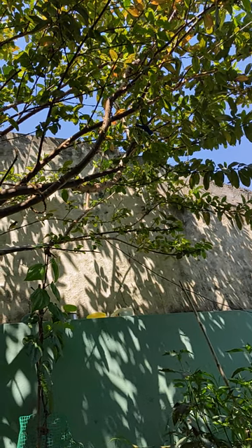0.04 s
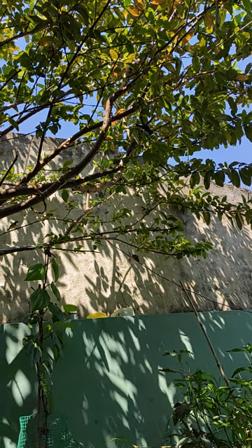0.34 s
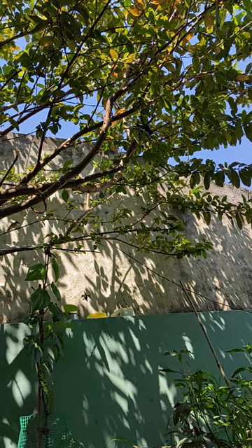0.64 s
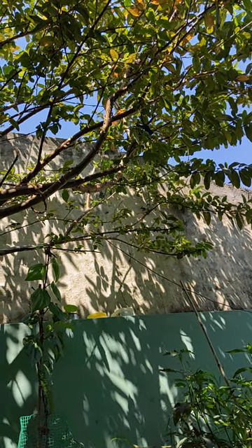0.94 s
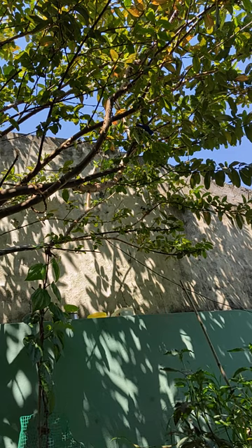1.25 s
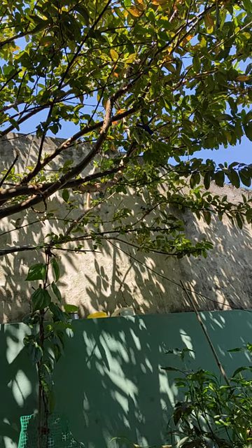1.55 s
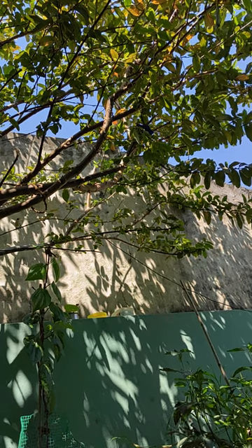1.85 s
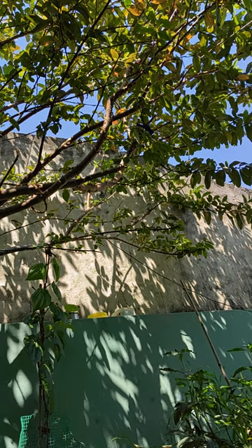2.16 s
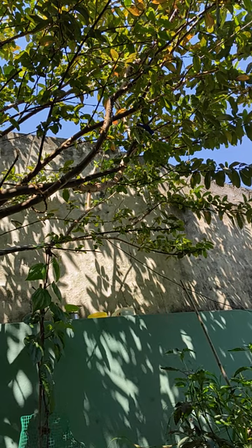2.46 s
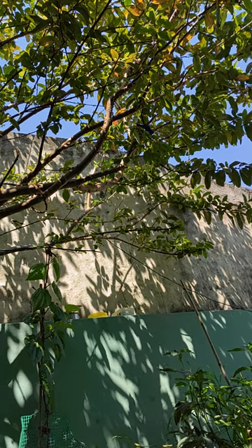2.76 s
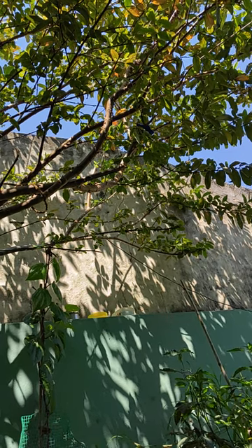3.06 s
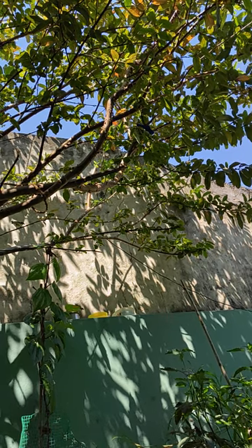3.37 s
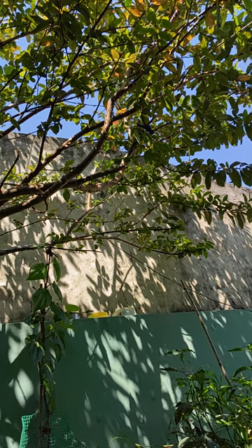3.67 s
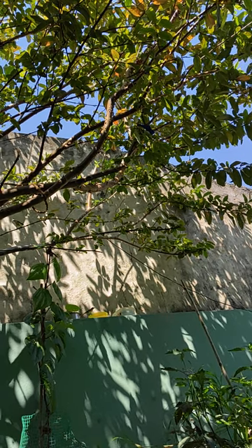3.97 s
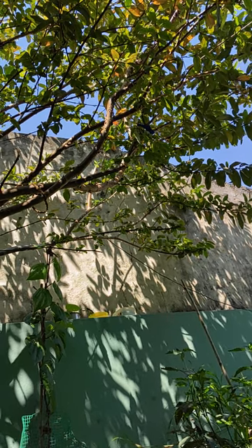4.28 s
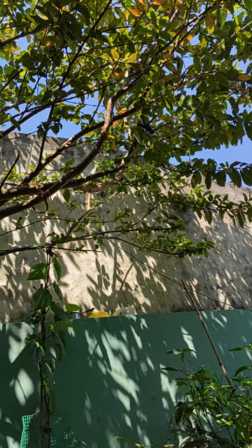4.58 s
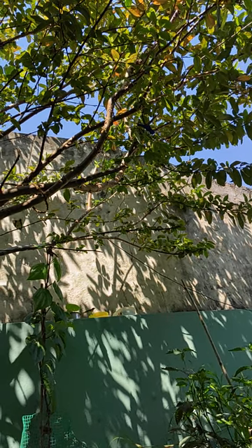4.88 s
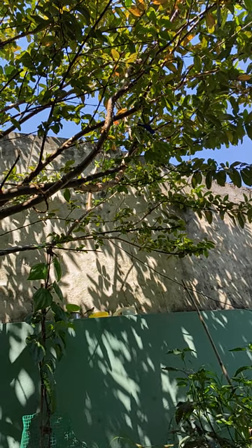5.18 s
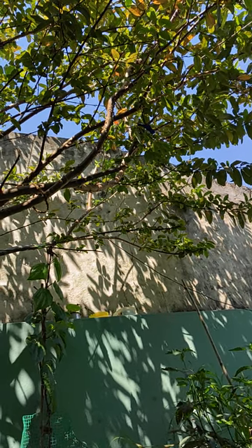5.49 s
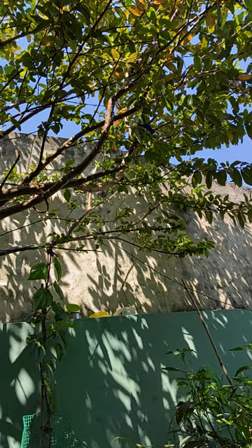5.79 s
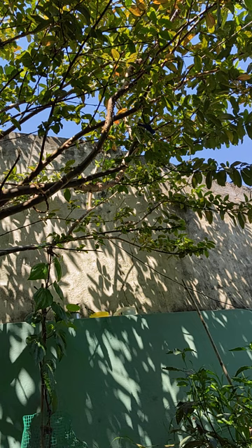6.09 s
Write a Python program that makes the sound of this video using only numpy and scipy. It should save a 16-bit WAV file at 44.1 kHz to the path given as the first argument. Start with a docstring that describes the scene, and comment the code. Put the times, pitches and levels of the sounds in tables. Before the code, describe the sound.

Busy high chirps, whistles and hoarse notes from small birds over a faint outdoor rumble, with a soft bump on the microphone.

```python
"""Small birds chirp in a tree over a walled garden: slurred whistles, sharp chips and hoarse notes.
The syrinx slides a tone for each whistle; unsteady vibration roughens the hoarse notes.
Other birds answer far off. Walls and leaves scatter every note.
A hand bumps the camera softly, at one microphone port and then the other,
over a low outdoor rumble, a faint hiss and one brief hum."""
import sys
import numpy as np
from scipy import signal
from scipy.fft import rfft, irfft, next_fast_len
from scipy.io import wavfile
from scipy.ndimage import uniform_filter1d, map_coordinates

SR = 44100
rng = np.random.default_rng(int(sys.argv[2]) if len(sys.argv) > 2 else 0)


def master_out(mix):
    """Clip the mix to full scale and print it as 16-bit PCM to the path in sys.argv[1]."""
    frames = np.transpose(np.atleast_2d(mix))
    ceiling = np.clip(frames, -1, 1)
    pcm = np.round(ceiling * 32767).astype(np.int16)
    wavfile.write(sys.argv[1], SR, pcm)


N = 279594


def amp(db):
    """Decibels to gain."""
    return 10 ** (np.asarray(db) / 20)


def unit(x):
    """Scale to rms 1."""
    return x / np.sqrt(np.mean(x ** 2) + 1e-20)


def along(points, hz):
    """Read (frequency [Hz], value) points on a log axis."""
    knots_hz, values = np.transpose(points)
    return np.interp(np.log(hz + 1), np.log(knots_hz + 1), values)


def wobble(rate_hz, size):
    """Smooth random curve, rate_hz knots a second."""
    knots = rng.standard_normal(int(size * rate_hz / SR) + 4)
    return map_coordinates(knots, [np.arange(size) * rate_hz / SR])


def filtered(x, response):
    """Apply a gain given as a function of frequency."""
    size = next_fast_len(N + SR // 2)
    return irfft(rfft(x, size) * response(np.fft.rfftfreq(size, 1 / SR)), size)[..., :N]


def add(track, time_s, sound):
    """Mix a stereo sound into the track."""
    start = int(np.clip(round(time_s * SR), 0, N - 1))
    track[:, start:start + sound.shape[1]] += sound[:, :N - start]


def gate(t, edge_s):
    """Smooth fade at both ends of t."""
    return np.sin(np.pi / 2 * np.clip(np.minimum(t - t[0], t[-1] - t) / edge_s, 0, 1)) ** 2


def swells_db(rows):
    """Bell-shaped level rises, per sample."""
    t = np.arange(N) / SR
    return sum(rise_db * np.exp(-((t - time_s) / width_s) ** 2) for time_s, width_s, rise_db in rows)


# Background stereo likeness: (frequency [Hz], left-right correlation [ratio])
COHERENCE = [(40, 0.53), (120, 0.75), (260, 0.9), (500, .45), (1000, 0.25), (4000, 0)]

def stereo_noise(spectrum):
    """Shaped noise of rms 1, the channels most alike in the bass."""
    def response(hz):
        angle = np.arccos(np.clip(along(COHERENCE, hz), -1, 1)) / 2
        return amp(along(spectrum, hz)) * np.array([np.cos(angle), np.sin(angle)])
    mid, side = filtered(rng.standard_normal((2, N)), response)
    return unit(np.array([mid + side, mid - side]))


# Noise spectra: (frequency [Hz], relative density [dB])
RUMBLE_SPECTRUM = [(25, -22), (50, -17.5), (85, -5.5), (120, -3.5), (160, -4.5), (204, 0), (235, -2.5),
                   (290, 1), (345, -9), (450, -15.5), (650, -29.5), (1100, -79)]
MURK_SPECTRUM = [(250, -18), (420, 0.5), (700, 5), (1000, 1.5), (1200, -9.5), (1600, -15.5), (2500, -49.5)]
HISS_SPECTRUM = [(600, -14), (1500, -5.5), (3000, 0), (5000, -2), (7000, -15), (9500, -26.5),
                 (15000, -25.5)]
# Slow drift: (time [s], relative level [dB])
RUMBLE_DRIFT = [(0.0, -62), (0.35, -64.5), (3.0, -65), (3.16, -61), (4.98, -68.5), (6.34, -65)]
HISS_DRIFT = [(0, -73.5), (3.3, -71), (3.8, -77), (4.1, -77.5), (5.2, -76.5), (6.34, -74.5)]
# Brief swells: (time [s], half width [s], rise [dB])
RUMBLE_RISES = [(.25, 0.12, 5), (1.63, 0.052, 10), (2.03, .05, 3), (2.26, 0.083, 6), (3.07, 0.064, 5),
                (3.37, 0.082, 4)]
MURK_RISES = [(.52, 0.17, 3), (.77, .07, 7.5), (2.08, 0.034, 5), (2.33, 0.0905, 11.5), (3.28, 0.26, 4.5),
              (4.68, .08, 7), (5.55, .2, 2.5)]

def outdoors(rumble_gain_db=2, murk_db=-69):
    """Neighbourhood rumble and murky midrange swell and ebb under a hiss of leaves and distance."""
    t = np.arange(N) / SR
    rumble_db = np.interp(t, *np.transpose(RUMBLE_DRIFT)) + rumble_gain_db
    rumble = amp(rumble_db + swells_db(RUMBLE_RISES)) * stereo_noise(RUMBLE_SPECTRUM)
    murk = amp(murk_db + swells_db(MURK_RISES)) * stereo_noise(MURK_SPECTRUM)
    hiss = amp(np.interp(t, *np.transpose(HISS_DRIFT))) * stereo_noise(HISS_SPECTRUM)
    return rumble + murk + hiss


def hum():
    """A brief low hum swells out of the rumble and sinks in pitch."""
    out, t = np.zeros((2, N)), np.arange(int(.2 * SR)) / SR
    pitch_hz = np.linspace(255, 175, len(t)) * (1 + .061 * wobble(76, len(t)))
    tone = amp(-51) * np.sin(2 * np.pi * np.cumsum(pitch_hz) / SR) * gate(t, edge_s=.047)
    add(out, time_s=2.96, sound=np.array([tone, tone]))
    return out


# Hand bumps: (time [s], pitch [Hz], level [dB], tick level [dB], blow left minus right [dB])
BUMPS = [(0.603, 122, -39.5, -51, 23), (.895, 115.3, -48, -45, -17)]

def camera_bumps(shudder_t60_s=1.04, tick_t60_s=.06, tick_hz=830):
    """Padded bumps on the case: a contact tick, a few low cycles at the nearer port, a slight shudder."""
    out, t = np.zeros((2, N)), np.arange(SR // 3) / SR
    for time_s, hz, level_db, tick_db, pan_db in BUMPS:
        blow = np.exp(-((t - .0145) / .0081) ** 2) * np.sin(2 * np.pi * hz * t)
        shudder = amp(-9 - 60 * t / shudder_t60_s) * np.sin(2 * np.pi * hz * t * .82)
        shudder *= gate(t, edge_s=.017)
        tick = amp(tick_db - 60 * t / tick_t60_s) * np.sin(2 * np.pi * tick_hz * t)
        tick *= gate(t, edge_s=.005)
        ports = []
        for side in (1, -1):
            thud = amp(side * pan_db / 2) * blow + shudder * wobble(110, len(t))
            ports.append(amp(level_db) * thud + tick * wobble(300, len(t)))
        add(out, time_s, np.array(ports))
    return out


# Garden reverberation: (frequency [Hz], T60 [s])
GARDEN_DECAY = [(600, .45), (3000, .34), (5500, .26), (12000, .22)]

def garden(x, direct_db, early_db, tail_db, pan_db=0):
    """Paths from one perch: direct sound, early echoes off walls and branches, a diffuse tail."""
    build_s, early_t60_s, right_lag_samples = .011, .09, 9
    hz, t, bands = signal.stft(rng.standard_normal((2, SR // 2)), SR, nperseg=256)
    decay = amp(-60 * t / along(GARDEN_DECAY, hz)[:, None])
    _, tail = signal.istft(bands * decay * np.clip(t / build_s, 0, 1), SR, nperseg=256)
    paths = amp(tail_db) * tail / np.linalg.norm(tail[0])
    delay_s = np.arange(paths.shape[1]) / SR
    early = rng.standard_normal(paths.shape) ** 3  # cubed: sparse, spiky echoes
    early *= amp(-60 * delay_s / early_t60_s) * (delay_s > .001)
    paths += amp(early_db) * early / np.linalg.norm(early, axis=1, keepdims=True)
    paths[0, 0] += amp(direct_db + pan_db / 2)
    paths[1, right_lag_samples] += amp(direct_db - pan_db / 2)
    return signal.fftconvolve(x[None], paths, axes=1)


# Distant calls: (time [s], length [s], start pitch [Hz], end pitch [Hz], source level [dB])
ANSWERS = [(1.225, .06, 2400, 2520, -76), (1.351, 0.039, 4280, 3870, -67), (2.04, .085, 840, 1018, -65),
           (2.26, .12, 1058, 1023, -60), (2.72, 0.095, 1183, 1155, -72), (2.927, 0.052, 3420, 2634, -62.5),
           (3.378, 0.1, 5030, 5560, -70.5), (3.433, 0.091, 6180, 6050, -67),
           (3.747, 0.054, 5200, 4960, -71), (3.787, 0.059, 4010, 2835, -59), (4.375, 0.06, 3290, 2470, -59),
           (4.379, 0.055, 2067, 2110, -59.5), (4.504, 0.045, 2235, 1965, -65.5),
           (4.601, 0.094, 1002, 1042, -68), (5.047, 0.032, 3550, 3665, -71.5),
           (5.138, 0.07, 660, 663, -62.5), (5.28, 0.052, 1425, 1286, -71)]

def far_birds():
    """Burry slurs from other trees arrive mostly as echo."""
    out = np.zeros((2, N))
    for time_s, length_s, start_hz, end_hz, level_db in ANSWERS:
        t = np.arange(int(length_s * SR)) / SR
        pitch_hz = np.linspace(start_hz, end_hz, len(t)) * (1 + .07 * wobble(1200, len(t)))
        tone = unit(np.sin(2 * np.pi * np.cumsum(pitch_hz) / SR))
        call = amp(level_db) * tone * gate(t, edge_s=.007)
        add(out, time_s, garden(call, direct_db=-13, early_db=.5, tail_db=-4))
    return out


# Hoarse notes:
# (time [s], length [s], pitch [Hz], throat resonance [Hz], source level [dB], roughness [factor])
HOARSE_NOTES = [(0.086, 0.036, 2062, 4700, -47.5, 0.38), (0.15, 0.0374, 2865, 4740, -50, 0.6),
                (0.817, 0.04, 3390, 3500, -56.5, 0.82), (1.5, 0.037, 2887, 2997, -58, 0.75),
                (1.584, 0.073, 1950, 2418, -57, 0.9), (1.861, 0.062, 2680, 2500, -61, 0.77),
                (1.954, 0.06, 2350, 3110, -58, 1.3), (2.165, 0.043, 2410, 2170, -66.5, 0.46),
                (2.267, 0.024, 2920, 3550, -59.5, 0.9), (2.582, 0.017, 3159, 5620, -58.5, 0.19),
                (2.704, 0.04, 2212, 5200, -46, 0.29), (2.783, 0.039, 2561, 2400, -50, 0.89),
                (5.236, 0.0395, 1560, 4630, -53, 0.17), (5.465, 0.026, 1455, 3800, -52.5, 0.18),
                (5.534, 0.028, 3100, 3500, -55, 0.7), (5.721, 0.038, 2180, 2870, -59.5, 0.68),
                (6.213, 0.04, 1558, 4260, -54, 0.17)]
# Clear notes arch further: (roughness [factor], arch depth [fraction of pitch])
ARCH_DEPTH = [(.2, .18), (.5, .1)]
# Beak radiation: (frequency [Hz], gain [dB])
BEAK_RESPONSE = [(1200, -6), (1800, 5.5), (7000, 4), (8600, -1), (9800, -44.5), (15000, -23.5)]

def hoarse_notes(throat_half_width_oct=.83):
    """Unsteady vibration smears a stack of harmonics that arches in pitch, shaped by throat and beak."""
    out = np.zeros((2, N))
    harmonics = np.arange(1, 5)[:, None]
    for time_s, length_s, hz, throat_hz, level_db, roughness in HOARSE_NOTES:
        t = np.arange(int(length_s * SR)) / SR
        depth = np.interp(roughness, *np.transpose(ARCH_DEPTH))
        arch = 1 + depth * (np.sin(np.pi * t / length_s) - np.pi / 4)
        jitter = 1 + .16 * roughness * wobble(1800, len(t))
        phase = 2 * np.pi * np.cumsum(hz * arch * jitter) / SR
        throat = 1 / (1 + (np.log2(harmonics * hz / throat_hz) / throat_half_width_oct) ** 2)
        stack = (throat * np.sin(harmonics * phase)).sum(axis=0)
        flutter = amp(8.4 * wobble(300, len(t)))
        note = amp(level_db) * unit(stack * flutter) * gate(t, edge_s=length_s / 4)
        add(out, time_s, garden(note, direct_db=-12.5, early_db=-3, tail_db=-1.5, pan_db=-7.5))
    return filtered(out, lambda hz: amp(along(BEAK_RESPONSE, hz)))


# Note contours by shape: (position [fraction of length], pitch [fraction of top], gain [dB])
CONTOURS = { "arch": [(0, .755, -18), (.08, .78, -1.5), (.19, .89, -19), (.3, 1, -17.5),
            (.385, .955, -12.5), (.46, .785, -2), (.62, .695, -1.5), (.78, .668, 1), (.92, .635, -6.5),
            (1, .615, -8.5)], "slur": [(0, 1, -11), (.1, .965, 1.5), (.28, .82, -6), (.52, .767, -3.5),
            (.76, .787, -7), (1, .785, -17)], "fall": [(0, 0.85, -18.5), (.08, 1, -5), (.26, .865, -5),
            (.5, .814, 2.5), (.75, .812, -2), (1, .725, -9)], "chip": [(0, .7, -14), (.27, 1, -0.5),
            (.45, .91, 0), (.7, .8, -13.5), (1, 0.77, -7)], "zip": [(0, .74, -14), (.12, .92, -8),
            (.29, 1, -4), (.42, .8, 0), (.56, .59, -3.5), (1, .525, -10)], "snap": [(0, .88, -21),
            (.27, 1, 0.5), (.45, 0.94, 0.5), (.58, .77, -5.5), (.73, .57, -15), (1, 0.395, -13.5)],
            "rise": [(0, .48, -10.5), (.17, .67, -3), (.29, .86, -0.5), (.56, .92, -1.5), (.78, 0.99, -2),
            (1, 0.94, -14)], "dome": [(0, .72, -24), (.035, .9, -8), (.09, 1, -3.5), (.42, 0.99, 2),
            (.58, .98, 3), (.72, .91, -3), (.85, .845, -1), (1, 0.71, -11.5)], "hook": [(0, .42, -6.5),
            (.08, .65, -7), (.14, 1, 1), (.28, 1, 0), (.58, .956, -2.5), (.83, .91, -1), (1, .8, -12.5)],
            "bow": [(0, .86, -10), (.17, .94, -0.5), (.35, 0.96, -4.5), (.56, 0.99, -7.5), (.8, .935, -2),
            (1, .81, -16.5)], "sink": [(0, 1, -14), (.16, .86, -2), (.38, 0.78, -0.5), (.63, 0.75, -2),
            (.85, .72, -5), (1, .68, -7)], "pip": [(0, .975, -18), (.42, 1, 0), (1, 0.99, -23)],
            "peep": [(0, 0.94, -9), (.25, 1, -0.5), (.55, .93, 0), (1, .87, -9.5)], }
# Syrinx unsteadiness: (pitch [Hz], jitter [fraction of pitch])
PITCH_JITTER = [(2000, 0.043), (3300, 0.03), (4000, 0.0087), (6000, 0.0031), (6800, 0.00056), (8300, 0.016)]
# Overtones before flicker: (pitch [Hz], level re fundamental [dB])
SECOND_HARMONIC = [(2500, -31), (4000, -25.5), (4800, -37.5), (5800, -54), (7000, -60)]
THIRD_HARMONIC = [(4200, -52), (4700, -42.5)]
# Higher singers sit to the right: (pitch [Hz], left minus right [dB])
SINGER_PAN = [(4200, -0.5), (5000, -6)]
# Higher singers sit closer: (pitch [Hz], direct path gain [dB])
SINGER_DIRECT = [(4200, -7), (5000, -2.5)]
# Song, main phrase chip-slur-arch: (time [s], shape [name], length [s], top pitch [Hz], base level [dB])
SONG = [ (0.0, "peep", 0.019, 4280, -40.5), (.045, "peep", 0.035, 2803, -45),
        (0.157, "peep", 0.042, 3440, -39.5), (0.196, "peep", .018, 2000, -44.5),
        (0.243, "zip", 0.05, 8150, -35), (0.352, "fall", 0.1, 6310, -38), (.51, "pip", 0.05, 6980, -40.5),
        (.576, "sink", .117, 7936, -38.5), (0.528, "peep", 0.037, 2777, -50),
        (0.808, "rise", 0.11, 4506, -41), (0.943, "chip", 0.058, 5890, -32),
        (1.06, "slur", .108, 5953, -39.5), (1.217, "arch", 0.19, 8480, -37.5),
        (1.602, "peep", .046, 4850, -41), (1.681, "chip", 0.042, 6003, -32.5),
        (1.809, "slur", 0.11, 6038, -37), (1.973, "arch", 0.19, 8510, -35.5),
        (2.366, "peep", 0.062, 4881, -44.5), (2.453, "chip", 0.039, 6050, -33.5),
        (2.583, "rise", .08, 4246, -46.5), (2.698, "peep", 0.044, 7100, -46),
        (2.771, "zip", .04, 8350, -39), (2.879, "slur", .118, 6033, -39.5),
        (3.051, "arch", .19, 8510, -38.5), (4.813, "dome", 0.3, 6720, -42.5),
        (5.329, "peep", .075, 4250, -46), (5.533, "snap", 0.033, 4410, -45.5),
        (5.546, "chip", .027, 5680, -44.5), (5.621, "bow", 0.17, 5300, -41.5),
        (5.882, "snap", 0.03, 6660, -31.5), (5.974, "hook", .1, 6130, -38.5),
        (6.314, "peep", 0.041, 4050, -50.5), ]

def whistles():
    """The syrinx slides a tone: pure in mid range, hoarse at its extremes and in fast slides."""
    out = np.zeros((2, N))
    for time_s, shape, length_s, top_hz, base_db in SONG:
        position, pitch_ratio, contour_db = np.transpose(CONTOURS[shape])
        t = np.arange(int(length_s * SR)) / SR
        pitch_hz = top_hz * uniform_filter1d(np.interp(t / length_s, position, pitch_ratio), size=180)
        slide_oct_per_s = np.abs(np.gradient(np.log2(pitch_hz))) * SR
        jitter = along(PITCH_JITTER, pitch_hz) + .0009 * np.minimum(slide_oct_per_s, 75)
        phase = 2 * np.pi * np.cumsum(pitch_hz * (1 + jitter * wobble(1100, len(t)))) / SR
        # overtones waver far more than the fundamental
        flicker = amp(5.4 * wobble(60, len(t))) * (1 + .61 * wobble(900, len(t)))
        second = amp(along(SECOND_HARMONIC, pitch_hz)) * np.sin(2 * phase)
        third = amp(along(THIRD_HARMONIC, pitch_hz)) * np.sin(3 * phase) * (3 * pitch_hz < SR / 2)
        tone = np.sin(phase) + flicker * (second + third)
        level_db = base_db + np.interp(t / length_s, position, contour_db) + .55 * wobble(120, len(t))
        note = np.sqrt(2) * amp(level_db) * tone * gate(t, edge_s=.003)
        pan_db = along(SINGER_PAN, pitch_hz.mean())
        direct_db = along(SINGER_DIRECT, pitch_hz.mean())
        add(out, time_s, garden(note, direct_db, early_db=-1.5, tail_db=-7, pan_db=pan_db))
    return out


def scene():
    """Birds, bumps and background together."""
    return whistles() + hoarse_notes() + far_birds() + camera_bumps() + hum() + outdoors()


def record(dry, band_limit_hz=15300):
    """The camera keeps nothing above its band limit."""
    return filtered(dry, lambda hz: hz < band_limit_hz)


dry = scene()
out = record(dry)
master_out(out)
```